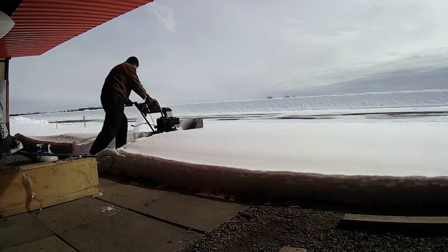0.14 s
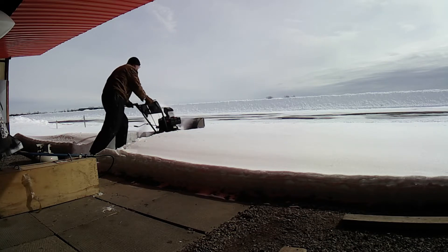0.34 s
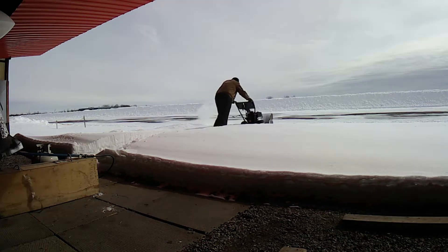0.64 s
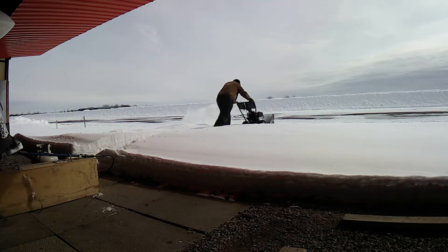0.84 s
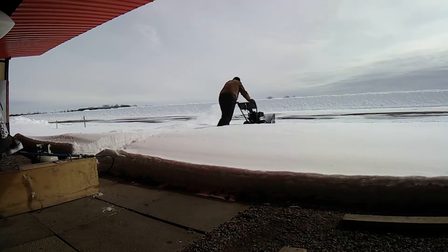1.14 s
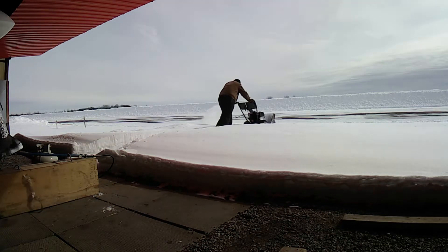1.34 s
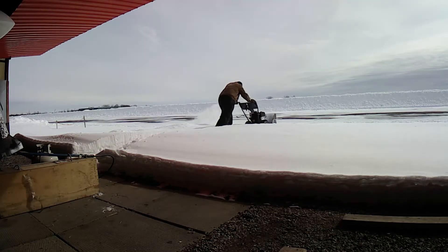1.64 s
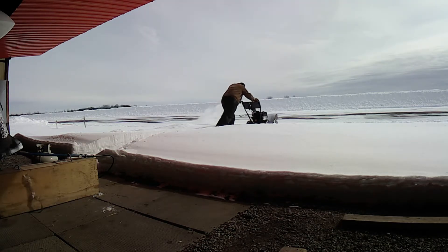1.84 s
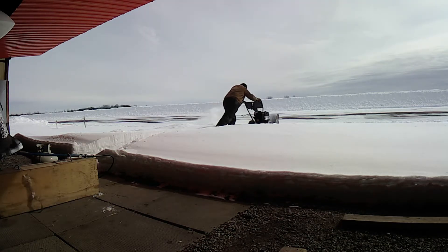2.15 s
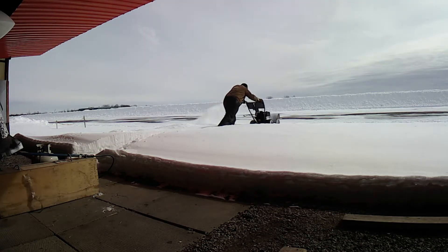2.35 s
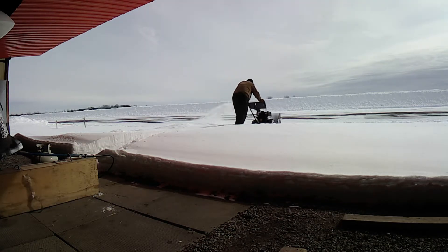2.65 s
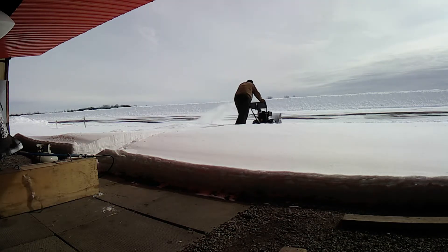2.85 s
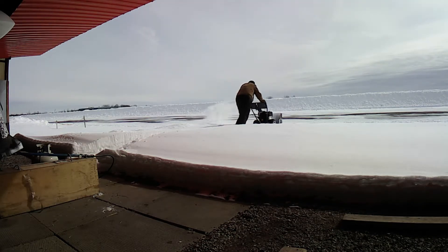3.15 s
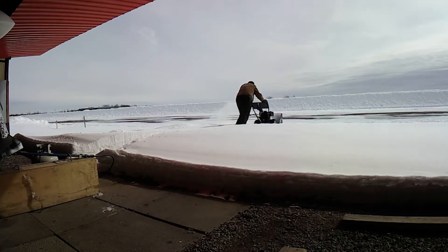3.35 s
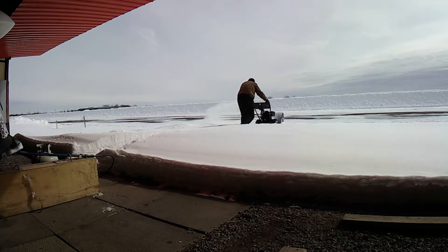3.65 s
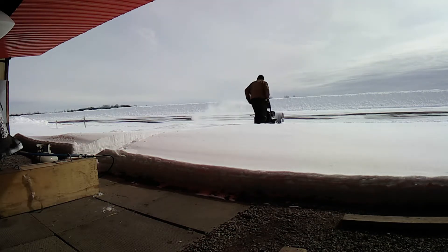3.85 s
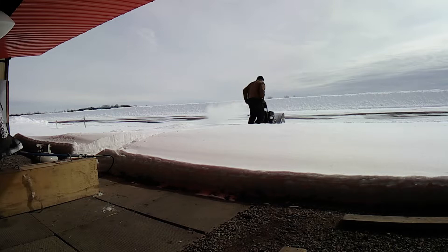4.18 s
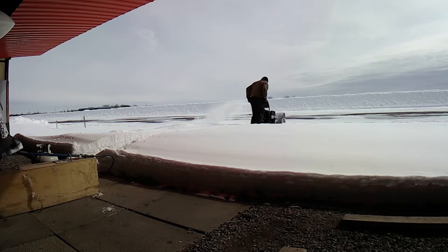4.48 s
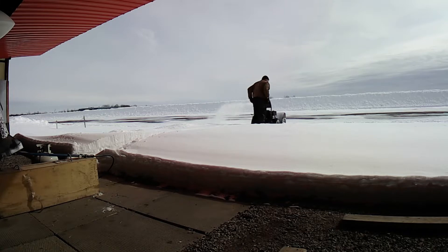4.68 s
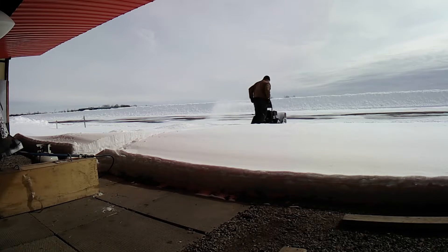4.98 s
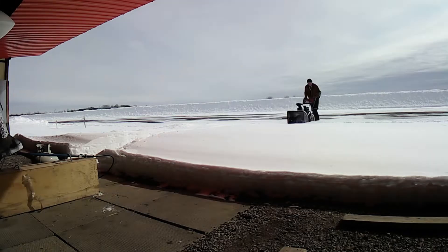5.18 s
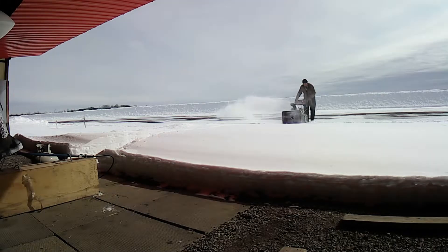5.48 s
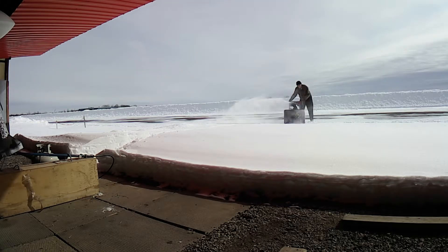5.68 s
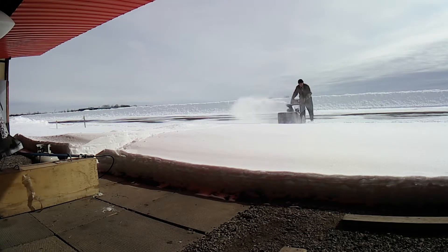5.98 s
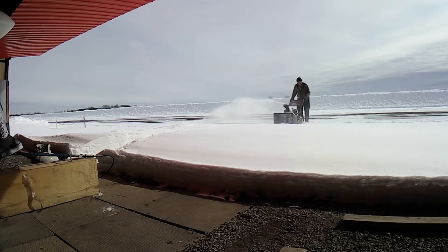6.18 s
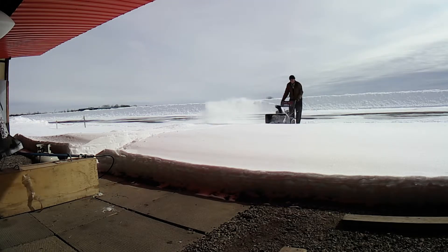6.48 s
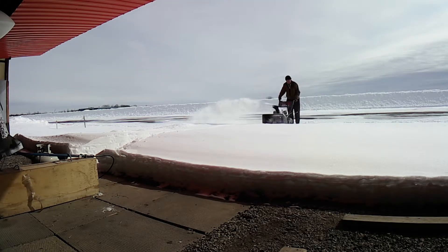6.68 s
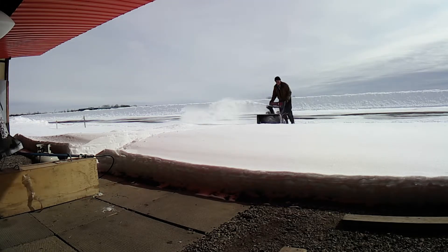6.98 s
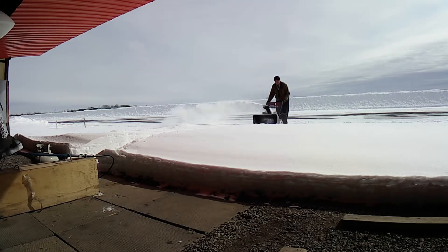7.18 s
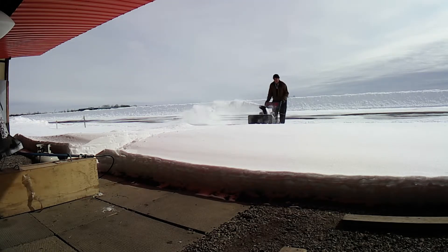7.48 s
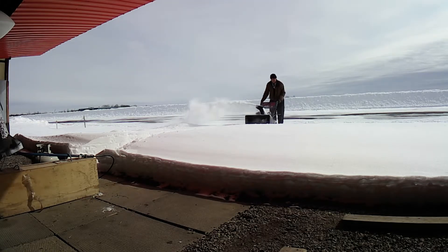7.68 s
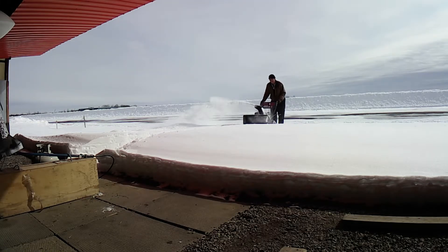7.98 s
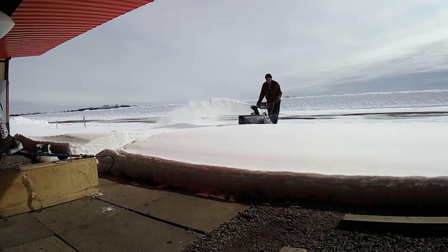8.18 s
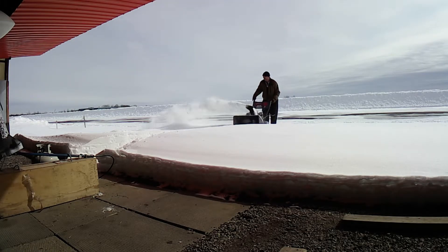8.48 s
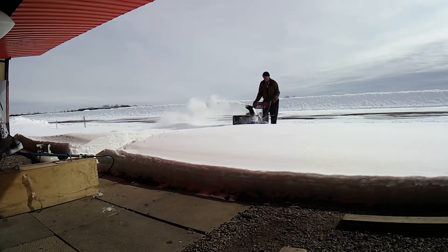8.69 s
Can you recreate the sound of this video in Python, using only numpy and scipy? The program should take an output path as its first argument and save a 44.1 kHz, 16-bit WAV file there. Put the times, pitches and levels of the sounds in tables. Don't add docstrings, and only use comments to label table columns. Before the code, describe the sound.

A small single-cylinder petrol snowblower works in open snow, distant and slightly sped up, heard through a thin, bass-light, nearly mono microphone. From 0 to 0.5 s a short run buzzes steadily, rising a little, beneath rough broadband hiss. A tiny gap cuts to a second pass: it starts high and rich with snow, sags by about 1 s, recovers near 1.5 s, dips again at 2 s, then climbs to its highest pitch around 4 s and stays fast until 5.2 s. Metallic whines come and go; packed lumps tick and thump in the chute. Another tiny gap and dull pop open the last pass, lower and rougher, slowing from 6 to 6.5 s and labouring near its lowest until a slight pickup at the end. Cyclic clatter and hiss persist, with airy spray puffs, strongest around 7.6 to 8 s, and fuller snow noise at the close.

```python
import sys
import numpy as np
from scipy import signal
from scipy.fft import rfft, irfft, next_fast_len
from scipy.io import wavfile
from scipy.ndimage import uniform_filter1d

SR = 44100
rng = np.random.default_rng(int(sys.argv[2]) if len(sys.argv) > 2 else 0)


def ratio(d):
    e = np.asarray(d, float) / 20
    return 10 ** e


def pcm_store(signal):
    levels = np.round(np.clip(np.atleast_2d(signal), -1, 1) * 32767)
    wavfile.write(sys.argv[1], SR, levels.astype(np.int16).T)


N = 389403
STEP = 40


def in_time(rows, t):
    s, *columns = np.transpose(rows)
    return [np.interp(t, s, c) for c in columns]


def at_hz(points, hz):
    f, db = np.transpose(points)
    return np.interp(np.log(hz), np.log(f), db)


def rms_one(x):
    return x / np.sqrt(np.mean(x ** 2) + 1e-20)


def drift(rate, size):
    settle = 2000
    r = np.exp(-2 * np.pi * rate * STEP / SR)
    noise = rng.standard_normal(size + settle)
    return rms_one(signal.lfilter([1], [1, -2 * r, r * r], noise)[settle:])


def stretch(slow, size):
    return np.interp(np.arange(size) / STEP, np.arange(len(slow)), slow)


def lifts(peaks, hz):
    return sum(db / (1 + (2 * (hz - centre) / width) ** 2) for centre, width, db in peaks)


def exhaust(per_s, k):
    strong_orders = (4, 5, 7, 8, 9, 10)
    strong_db = [(4, 5.8, -0.5, 1, 0.5, .1), (4, 3.9, 0, 3, -1.5, -8), (4, 5.2, -5, 6.4, 2, -4)]
    # f/Hz, level/dB
    muffler = [
        [(59, -124), (100, -99), (232, -62.5), (357, -66), (483, -56.5), (750, -57.5), (900, -60), (1750, -60)],
        [(71, -120), (150, -89), (265, -77.5), (420, -69.5), (600, -61.5), (900, -64), (1200, -66),
         (2100, -68.5)],
        [(90, -94), (140, -81), (205, -82.5), (300, -69.5), (420, -63), (600, -63.5), (720, -66.5),
         (1800, -65.5)],
    ]
    # f/Hz, width/Hz, lift/dB
    pipe = [
        [(709, 30, 13), (1018, 42, 21.5), (1500, 56, 6)],
        [(308, 102, 15.5), (475, 25, 4.5), (570, 42, 9), (673.4, 62, 9.5), (802.5, 78, 11.5), (860, 42, -11.5),
         (1020, 120, 5.5), (1137.5, 41, 7), (1205, 85, 8), (1281, 81, 10.5), (1450, 44, 7), (1695, 24, 14),
         (1890, 76, 13.5)],
        [(251, 53, 7), (547, 55, 6), (599, 33, 4.5), (678, 66, 6.5), (830, 54, 3), (896.6, 42, 11),
         (935, 17, -6), (973, 67, 14), (1100, 25, -4.5), (1137, 60, 10), (1189, 33, 7), (1590, 50, 9.5)],
    ]
    roughness = [1.2, .9, 1.35]
    rough = roughness[k]
    turns = np.cumsum(per_s) / SR
    size, steps = len(turns), len(per_s[::STEP])
    out = np.zeros(size)
    for order in range(1, 13):
        hz = order * per_s[::STEP]
        wander_db = 4.0 if order > 5 else 1.5 * rough
        level_db = at_hz(muffler[k], hz) + lifts(pipe[k], hz) + wander_db * np.minimum(drift(3.5, steps), 0.7)
        if order in strong_orders:
            level_db = level_db + strong_db[k][strong_orders.index(order)]
        slip = rough * (0.12 + 0.022 * order) * drift(11.0, steps) + 2 * np.pi * rng.random()
        flutter_db = 1.5 * rough * drift(26.4, steps)
        height = np.sqrt(2) * ratio(level_db + flutter_db)
        out += stretch(height, size) * np.sin(2 * np.pi * order * turns + stretch(slip, size))
    return out


def clatter(per_s, memory, size=256):
    settle = 40
    turns = np.cumsum(per_s) / SR
    fresh = rng.standard_normal((int(turns[-1]) + settle + 1, size))
    cycles = signal.lfilter([1], [1, -memory], fresh, axis=0)[settle:]
    return rms_one(np.interp(turns * size, np.arange(cycles.size), cycles.ravel()))


def roar_levels(t, per_s, k):
    # t/s, level/dB
    thrown = [
        [(0.0, -1), (0.35, 0.5), (0.493, .5)],
        [(0.5, 4), (0.63, 5.5), (0.84, 0.5), (1.1, 0.5), (1.33, 2.5), (1.61, 2.5), (1.87, 0), (2.22, 0),
         (2.56, 1), (2.94, 0), (3.56, 1.5), (3.91, 0.5), (4.34, -0.5), (4.62, 0.5), (4.87, -1), (5.2, -1)],
        [(5.2, 2), (5.53, 0), (6.1, 0.5), (6.46, -0.5), (6.83, -0.5), (7.34, -2), (7.81, -1), (8.01, 1),
         (8.43, 1.5), (8.83, 4)],
    ]
    # housing level/dB, chute level/dB, spray level/dB, air level/dB
    mean_db = [(-44, -42, -44, -57), (-50, -44.5, -44, -61.5), (-47.5, -44, -51.5, -62)]
    mean_per_s = [122, 150, 112]
    throw_share = (0.26, 0.77, 1.24, 0.81)
    speed_slope = (7.5, 4.9, .1, .1)
    throw_db, = in_time(thrown[k], t)
    octaves = np.log2(per_s / mean_per_s[k])
    parts = zip(mean_db[k], throw_share, speed_slope)
    return [db + share * throw_db + slope * octaves for db, share, slope in parts]


def roar_shape(hz, k, size):
    # f/Hz, level/(dB per Hz)
    colour = [
        [(760, -36), (1300, -8), (1520, -2), (2140, -1.5), (2330, -5.5), (3150, -2.5), (5420, -6.5), (6750, -6),
         (11500, -16.5), (14400, -21), (15700, -21)],
        [(760, -35), (1300, -7), (1540, -4.5), (2060, -2.5), (2260, 1), (2480, -5), (3760, -0.5), (4780, -10.5),
         (5370, -2.5), (6020, -11), (7260, -7.5), (9920, -17.5), (13600, -15.5), (15700, -21.5)],
        [(760, -50), (1300, -5), (1400, -9), (1700, -1.5), (2260, -5), (3020, -2), (3460, -11), (4450, -5.5),
         (4830, -8.5), (5960, -5.5), (7110, -11.5), (11000, -21.5), (13000, -30), (15700, -24.5)],
    ]
    # f/Hz, level/(dB per Hz)
    rumble = [
        [(15, -68), (25, -34), (102, -36), (146, -30.5), (228, -31.5), (290, -20), (362, -12.5), (422, -11),
         (682, 0.5), (882, -2), (1120, 3.5), (1500, -10.5), (1950, -38), (3300, -120)],
        [(15, -70), (25, -45), (192, -29.5), (290, -16.5), (362, -11.5), (401, -14), (460, -9.5), (519, -3),
         (682, -5.5), (897, -1), (1080, -9), (1500, -11), (1950, -38), (3300, -120)],
    ]
    rumble_db = [-7.5, -3, 0]
    # f/Hz, width/Hz, lift/dB
    panels = [
        [(1500, 140, 1.5), (2200, 75, -1), (3130, 96, 3), (4540, 54, 3), (6900, 330, 3), (14000, 200, 5)],
        [(1900, 64, 5.5), (2176, 32, 5.5), (3700, 180, 1), (5390, 250, -3.5), (6850, 130, 2.5), (7170, 120, -5),
         (10700, 300, 2.5), (14000, 300, 4)],
        [(1740, 42, 1.5), (2750, 120, 1), (3160, 510, 3.5), (4200, 360, 2.5), (5320, 270, 3), (11000, 110, 4)],
    ]
    ripple_db = rms_one(uniform_filter1d(rng.standard_normal(len(hz)), size=round(60 * size / SR)))
    machine = ratio(at_hz(colour[k], hz) + lifts(panels[k], hz) + ripple_db)
    burning = ratio(at_hz(rumble[k // 2], hz) + rumble_db[k])
    return np.hypot(machine, burning)


def roar(t, per_s, k):
    repeat = [.4, .55, .35]
    edges = (1500, 3000, 6500, 13000, 15600)
    size, steps = next_fast_len(len(t)), len(t[::STEP])
    hz = np.maximum(np.arange(size // 2 + 1) * SR / size, 1)

    cyclic = repeat[k] / (1 + (hz / 9500) ** 2) * (hz > 1300)
    hiss = rfft(rng.standard_normal(size)) / np.sqrt(size)
    repeats = rfft(clatter(per_s, memory=0.872), size)
    repeats = repeats / np.sqrt(uniform_filter1d(np.abs(repeats) ** 2, size=size // 40))
    shape = roar_shape(hz, k, size)
    coloured = shape * (np.sqrt(1 - cyclic) * hiss + np.sqrt(cyclic) * repeats)

    spans = list(zip(edges, edges[1:]))
    as_made_db = [10 * np.log10(2 * np.sum(shape[(hz > a) & (hz < b)] ** 2) / size ** 2) for a, b in spans]
    trims_db = np.array(roar_levels(t, per_s, k))[:, ::STEP] - np.array(as_made_db)[:, None]
    places = np.log([np.sqrt(a * b) for a, b in spans])

    together_db = 0.35 * drift(26.0, steps) + 0.48 * drift(48.0, steps)
    breath = np.cos(2 * np.pi * np.cumsum(per_s) / SR)
    thirds = np.clip(3 * np.log2(hz), 27, 42)
    out = np.zeros(len(t))
    for third in range(27, 43):
        overlap = np.clip(1 - np.abs(thirds - third), 0, 1)
        band = irfft(coloured * overlap, size)[:len(t)]
        centre = 2 ** (third / 3)
        weights = np.array([np.interp(np.log(centre), places, row) for row in np.eye(len(spans))])
        high = np.clip(np.log2(centre / 900) / 2.5, 0, 1)
        own_db = 0.74 * drift(19.0, steps) + 0.52 * drift(1.9, steps)
        gain = stretch(ratio(weights @ trims_db + own_db + high * together_db), len(t))
        out += band * gain * (1 + 0.074 * high * breath) * (1 + snow_swell(t, centre))
    return out


def whines(t, per_s):
    # firing order, start t/s, end t/s
    tones = [(35, .5, .88), (33, .85, 1.25), (36, 1.1, 2.0), (35, 1.3, 1.9), (38, 1.35, 1.8),
             (25, 1.3, 1.9), (18, 1.45, 1.8), (30, 1.45, 1.8), (16, 2.1, 2.8), (54, 1.9, 3.0),
             (38, 2.1, 2.6), (36, 2.85, 3.55), (54, 3.35, 3.75), (14, 3.35, 3.9), (12, 4.38, 4.65),
             (32, 4.7, 5.15), (36, 4.8, 5.15), (26, .03, .28), (7, .55, .7), (6, 3.9, 4.1), (4, 4.25, 4.4),
             (7, 4.15, 4.45), (8, 4.75, 4.97), (7, 5.05, 5.19), (8, 5.21, 6.0), (15, 7.3, 8.83),
             (8, 5.95, 6.45), (12, 2.9, 3.2)]
    tone_db = [-53, -60, -51, -64, -62, -60, -57, -58, -65, -57, -59, -59, -53, -56, -53, -58, -56, -51,
               -46, -50, -50, -50, -46.5, -52.5, -59.5, -60, -50, -57.5]
    turns, out = np.cumsum(per_s) / SR, np.zeros(len(t))
    for (order, start, end), level_db in zip(tones, tone_db):
        on = (t > start) & (t < end)
        size = on.sum()
        steps = size // STEP + 1
        fade = np.sqrt(np.abs(np.sin(np.pi * (t[on] - start) / (end - start))))
        waver = stretch(ratio(level_db + 3.0 + 3.0 * drift(10.0, steps)), size)
        slip = stretch((0.12 + 0.011 * order) * drift(8.0, steps), size)
        out[on] += fade * waver * np.sin(2 * np.pi * order * turns[on] + slip)
    return out


def snow_swell(t, hz):
    # t/s, peak level/dB, centre f/Hz
    packed = [(0.3431, -24.5, 2130), (0.5364, -31, 3240), (0.623, -32, 3800), (0.6425, -22, 2980),
              (1.468, -22, 3500), (1.668, -29, 5430), (2.1384, -33, 2160), (2.8519, -30, 3490),
              (2.9437, -33, 3790), (3.0114, -33, 3120), (3.1294, -28, 3136), (3.239, -25, 3857),
              (3.7414, -27, 3780), (3.8065, -32, 3700), (3.9644, -26, 3496), (4.066, -22, 2177),
              (4.2527, -25, 3840), (4.799, -25, 3690), (7.9943, -28, 3100), (8.4756, -32, 2830)]
    # t/s, peak level/dB, centre f/Hz, decay t/s
    sprays = [
        (.62, -41, 9050, 0.055),
        (3.59, -35, 9000, 0.048),
        (4.15, -31, 8950, 0.043),
        (6.495, -37, 11000, .04),
        (6.67, -35, 8980, .04),
        (6.97, -36, 9030, 0.029),
        (7.635, -31, 8000, 0.042),
        (7.782, -25.5, 11010, 0.082),
        (7.965, -27, 14000, .04),
        (8.689, -38, 8940, 0.035),
    ]
    lump_decay_s = 0.021
    swell = np.zeros(len(t))
    for start, peak_db, centre, decay_s in [(*row, lump_decay_s) for row in packed] + list(sprays):
        near = slice(*np.searchsorted(t, [start, start + 0.15]))
        age = t[near] - start
        reach = np.exp(-(np.log2(hz / centre) / 0.68) ** 2)
        onset = 1 - np.exp(-age / 0.0007)
        swell[near] += reach * onset * ratio(peak_db + 36 - 60 * age / decay_s)
    return swell


def scene():
    # start t/s, end t/s
    passes = [
        (0, .493),
        (.4979, 5.1976),
        (5.2026, 8.84),
    ]
    # t/s, firing f/Hz
    firing = [
        [(0.0, 116.5), (0.14, 121), (0.28, 122), (0.38, 126.5), (0.493, 122.5)],
        [(0.67, 160), (0.77, 153), (0.91, 133), (1.08, 132.5), (1.49, 152.5), (1.8, 149), (1.99, 132.5),
         (2.25, 137), (2.85, 139.3), (3.15, 143.5), (3.41, 156), (3.75, 157.5), (4.03, 170), (4.3, 159.5),
         (4.54, 157.3), (4.72, 162), (5.04, 163.8), (5.2, 158.8)],
        [(5.2, 146), (5.33, 145.5), (5.44, 137.5), (5.8, 137), (6.0, 130.5), (6.36, 115.5), (6.53, 104),
         (6.69, 102), (6.8, 106.5), (7.03, 105), (7.35, 100.6), (7.82, 99.4), (7.96, 103.8), (8.13, 104),
         (8.24, 99.5), (8.44, 97.8), (8.83, 108.5)],
    ]
    out = np.zeros(N)
    for k, (start, end) in enumerate(passes):
        first, last = round(start * SR), min(round(end * SR), N)
        t = np.arange(first, last) / SR
        per_s, = in_time(firing[k], t)
        per_s = uniform_filter1d(per_s, size=3600, mode="nearest")
        out[first:last] = exhaust(per_s, k) + whines(t, per_s) + roar(t, per_s, k)
    join = round(passes[2][0] * SR)
    out[join:join + 60] -= ratio(-47) * np.hanning(60)
    return np.array([out, out])


def channel_difference(mono):
    size = 2048
    side, window = np.zeros(N), np.hanning(size)
    for when, where in rng.random((21, 2)):
        low_hz = 6000 + where * (12400 - 6000)
        at = int(when * (N - size))
        band = signal.butter(4, [low_hz, 1.19 * low_hz], "band", fs=SR, output="sos")
        side[at:at + size] += 0.48 * window * signal.sosfilt(band, mono[at:at + size][::-1])
    return side


def top_cut(x):
    return signal.sosfilt(signal.butter(12, 16870, fs=SR, output="sos"), x)


def record(dry):
    stereo = dry + channel_difference(dry[0]) * [[1], [-1]]
    low_pass = signal.ellip(12, 0.3, 70, 15720, fs=SR, output="sos")
    mix = signal.sosfilt(low_pass, stereo)
    return top_cut(mix)


dry = scene()
out = record(dry)
pcm_store(out)
```